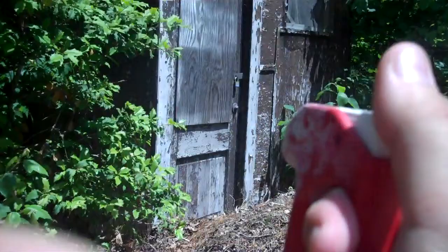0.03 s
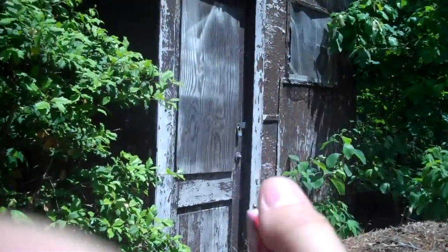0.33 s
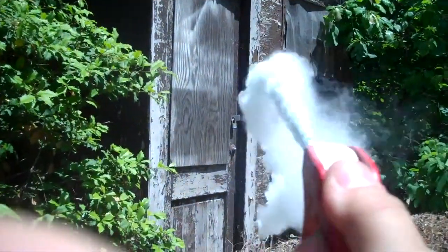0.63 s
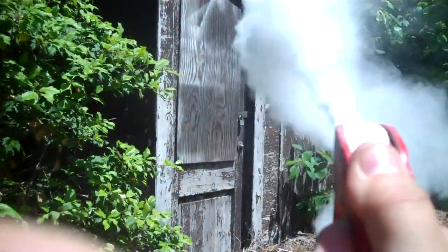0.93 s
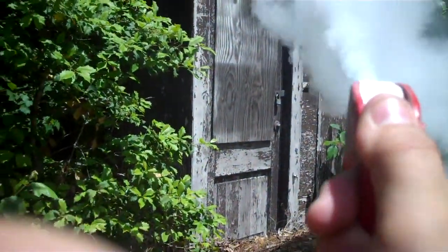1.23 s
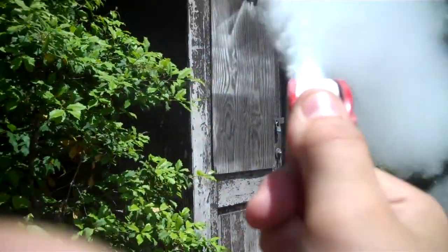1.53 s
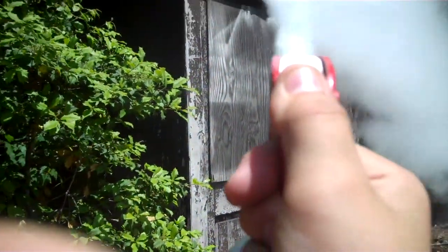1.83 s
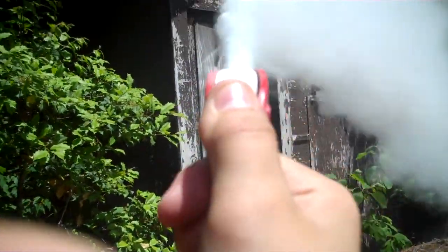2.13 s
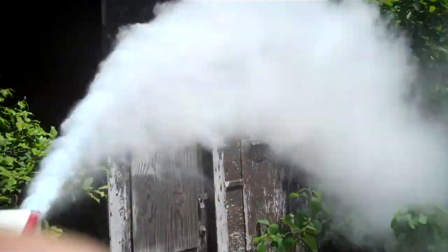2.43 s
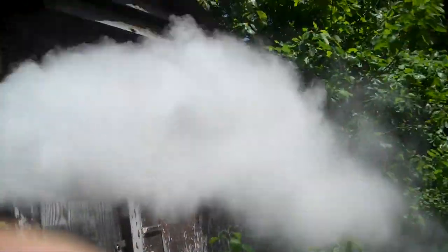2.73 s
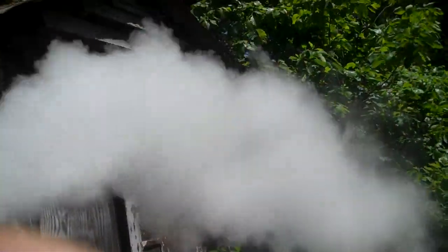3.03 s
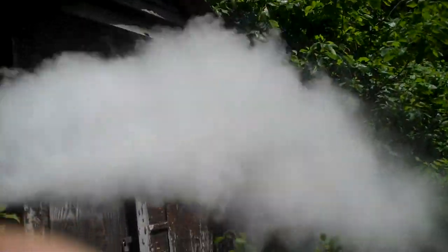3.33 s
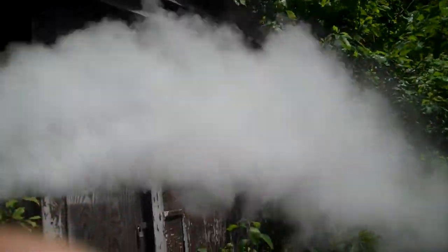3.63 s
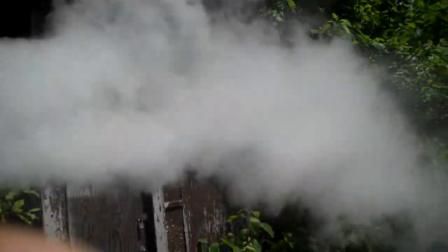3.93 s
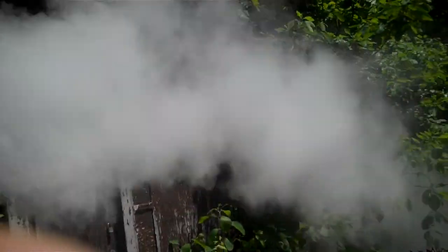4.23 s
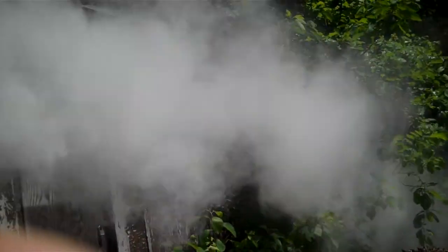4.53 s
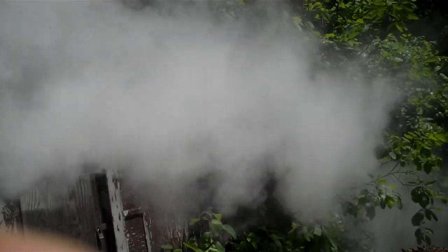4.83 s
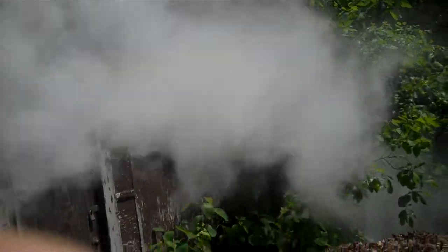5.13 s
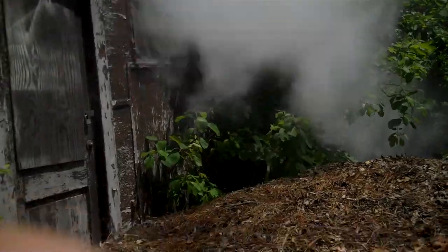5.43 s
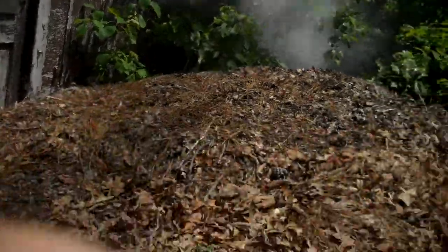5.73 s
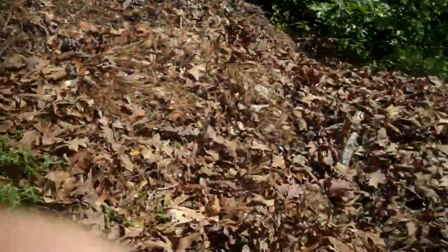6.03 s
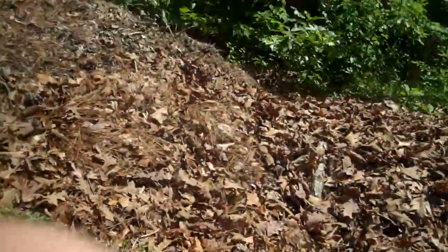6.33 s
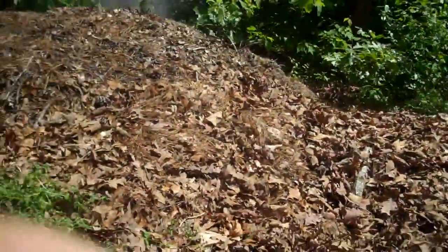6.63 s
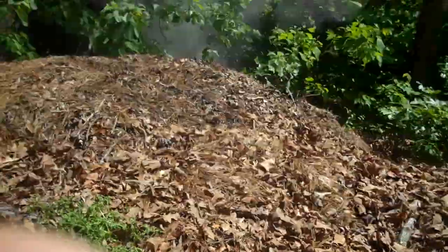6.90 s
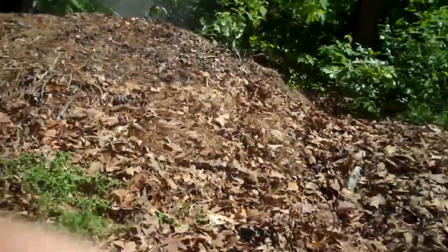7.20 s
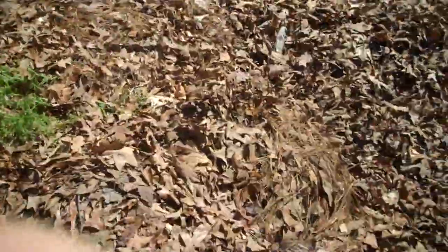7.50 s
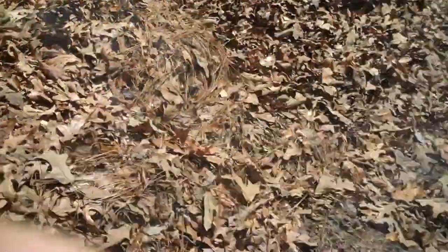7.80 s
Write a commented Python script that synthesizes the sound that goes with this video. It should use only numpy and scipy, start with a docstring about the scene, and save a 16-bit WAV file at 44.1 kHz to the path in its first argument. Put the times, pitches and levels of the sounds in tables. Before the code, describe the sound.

In a quiet wooded yard, dry leaves rustle and the plastic handle of a small fire extinguisher clicks lightly during the first second. At 1 second the valve pops with a dull whump, and a loud, close jet of gas and powder bursts out. It starts as a bright hissing roar and sputters and spits unevenly until about 3 seconds. Between 2.2 and 2.8 seconds its tone shifts as the nozzle swings aside. The jet weakens steadily and is gone just after 5 seconds. A few soft, short bird whistles come between 4.3 and 5.3 seconds. From 6 seconds to the end at about 8, feet shuffle and crunch through dry leaves with sharp little twig snaps, much quieter than the jet. One more bird whistles near the end. A soft outdoor hush and a very faint, distant mower drone lie underneath throughout.

```python
"""In a wooded yard, with a mower droning far away, leaves rustle and a small fire extinguisher is handled.
After one second its valve pops and a jet of gas and powder roars out, sputtering as the powder feeds
unevenly. The jet swings aside, then dies away by five seconds as the pressure falls, and birds whistle.
From six seconds on, feet shuffle through dry leaves and snap twigs. All of it is heard through two
closely spaced microphone openings (ports) beside the nozzle."""
import sys
import numpy as np
from scipy import signal
from scipy.fft import rfft, irfft
from scipy.io import wavfile

SR = 44100
rng = np.random.default_rng(int(sys.argv[2]) if len(sys.argv) > 2 else 0)


def generate_wav(signal):
    """Clip the signal to [-1, 1] and save it as 16-bit WAV at the path in sys.argv[1]."""
    frames = np.transpose(np.atleast_2d(signal))
    scaled = np.clip(frames, -1, 1) * 32767
    pcm = np.round(scaled).astype(np.int16)
    wavfile.write(sys.argv[1], SR, pcm)


N = 355446
TIME = np.arange(N) / SR
FREQ = np.maximum(np.arange(N // 2 + 1) * SR / N, 1)
VALVE_S, CUTOFF_HZ = 1.0105, 14300  # when the valve opens; where the treble ends

# The tone and direction of the jet when it points ahead. Each row: frequency in Hz, relative level in dB,
# how much louder the left port is in dB, how far the left wave runs ahead in radians.
JET_FRONT_TONE = [(116, -25.5, 0.5, 0), (350, -17, 3, 0), (640, -10, 2.5, -2.5), (930, -9.5, 2.5, 0.5),
                  (1700, -2, 2, 0.14), (2520, 1, 5, 0.5), (3200, -2, 10.5, -1.5), (3750, 0.5, 0.5, -2.08),
                  (5050, -4, -8.5, 0), (5240, 1.5, -4, -1.5), (6450, -2.5, -0.5, 1), (7100, -2, 13, 0.5),
                  (8840, -11.5, 10.5, -2.1), (10630, -18.5, 13, -1.5), (11400, -60, 19, -2.5)]
# The tone and direction of the leaves underfoot, with the same columns.
LEAF_TONE = [(100, -59, 2, 0), (366, -10, 3, 1), (660, -11, 3, -.1), (1110, -14, 3.4, 6),
             (1800, -14, 0.87, 0.9), (3000, -10, 2.9, 0.7), (4600, -6, 6.6, 1), (5600, -3.5, 1, 1),
             (6800, 2.5, 17.4, -1.5), (7560, -5, 17, -1.3), (9560, -21, 7.6, -2.5), (14000, -28, 19, -2)]


def jet(sputter_db=1.53, flutter_db=1.26, powder_share=0.59,
        roar_gain_db=-0.97, hiss_gain_db=-2.0, sizzle_db=-14):
    """Swirling gas carries powder grains; the uneven feed makes it sputter, less as the pressure falls."""
    # The nozzle's swing. Each row: time in seconds, position from 0 (ahead) to 1 (aside).
    swing = [(2.2, 0.022), (2.45, 0.36), (2.6, 0.61), (2.8, 1.0)]
    # The jet when it points aside, with the same columns as JET_FRONT_TONE.
    jet_aside_tone = [(100, -27, 4, 1), (252, -19, 4, .1), (784, -8.5, 4, 0.17), (1090, -9.5, 5, 0),
                      (2220, -2, 5, 0.5), (3400, -0.5, 4.5, 0.55), (4450, -4.5, 1.5, 1.0),
                      (5520, -0.5, -2, 1.72), (6090, 1, 2.5, 3.5), (7000, 0, 22, 1), (8100, -4.5, 13, 2.4),
                      (9400, -19.5, 10, 1.2), (10500, -40.5, 6, 2.5)]
    roar_db, hiss_db = jet_levels()
    aside = np.clip(in_time(swing)[0], 0, 1)
    pressure = from_db(0.1 * (roar_db - roar_db.max()))
    wobble_db = pressure * (sputter_db * drift(43) + flutter_db * drift(330))
    out = 0
    for tone, share in (JET_FRONT_TONE, 1 - aside), (jet_aside_tone, aside):
        powder = band(grains(3000, spread_db=5.5), 680, 4700)
        flow = rng.standard_normal(N) + powder_share * pressure * powder
        roar, hiss = low_and_high(flow, tone, split_hz=4770)
        roar = roar * from_db(roar_db + roar_gain_db + wobble_db)
        hiss = past_the_hand(hiss, aside) * from_db(hiss_db + hiss_gain_db + 0.88 * wobble_db)
        out = out + np.sqrt(share) * (roar + hiss)
    # the fastest flow adds a sizzle at the very top, which grows faster than the hiss
    sizzle = band(band(rng.standard_normal(N), 9300, 14000), 9300, 14000)
    sizzle_gain = from_db(hiss_db + sizzle_db + 0.67 * (hiss_db - hiss_db.max()))
    out = out + placed(sizzle / rms(sizzle) * sizzle_gain, JET_FRONT_TONE)
    return out * gate(VALVE_S, 5.1, rise=0.00094, fall=0.17)


def jet_levels(hiss_below_db=8.5, opening_end_s=1.41, opening_fade_s=0.34, hiss_build_s=0.088):
    """Roar and hiss in dB: both follow the flow; gulps of powder move the roar, flares of gas the hiss."""
    # The flow weakens as the canister empties. Each row: time in seconds, level in dB.
    flow = [(1.01, -22), (1.8, -22.5), (2.58, -25.5), (3.15, -32.5), (4.05, -37.5), (4.96, -50.5),
            (5.3, -69)]
    # The powder surges (+) or chokes (-). Each row: middle in seconds, length in seconds, change in dB.
    gulps = [(1.08, 0.25, 4), (1.315, 0.11, -5), (1.71, .04, 3), (1.74, 0.047, -5), (1.77, .04, 4),
             (1.945, 0.024, -2.5), (2.06, 0.083, -6), (2.097, 0.029, 4), (2.15, .04, -3), (2.2, .05, -1.5),
             (2.43, 0.15, -3.5), (2.52, 0.14, 2), (2.72, 0.26, -2.5), (2.812, 0.035, 6), (2.91, 0.082, -6),
             (2.98, 0.16, 2.5), (3.41, .1, 2.5)]
    # Flares of nearly pure gas, with the same columns as the gulps.
    flares = [(1.11, .09, 6.5), (1.25, 0.11, 7), (2.02, 0.15, 6), (2.35, 0.14, 9), (2.69, .2, 3.5),
              (3.62, 0.54, 3.5), (4.25, 0.44, 4.5)]
    flow_db, = in_time(flow)
    # at first the gas carries little powder and sounds bright
    opening_db = 9 * np.clip(1 - (TIME - opening_end_s) / opening_fade_s, 0, 1)
    # the hiss builds up behind the first slug of powder
    lag_db = 7 * np.clip(1 - ((TIME - VALVE_S) / hiss_build_s) ** 2, 0, 1)
    return flow_db + swells(gulps), flow_db - hiss_below_db + opening_db - lag_db + swells(flares)


def past_the_hand(x, aside, depth=0.86, first_hz=6000, last_hz=10000):
    """While the nozzle swings, sound bouncing off the hand cancels a rising band of the hiss."""
    delay = .5 / (first_hz + (last_hz - first_hz) * aside)
    strength = depth * np.sqrt(4 * aside * (1 - aside))
    bounce = np.array([np.interp(TIME - delay, TIME, side) for side in x])
    return (x + strength * bounce) / (1 - .5 * np.minimum(strength, 1))


def first_gust(gust_db=-27, decay_s=0.23, thump_db=-37):
    """The first slug of powder leaves with a dull whump and jolts the hand."""
    age = np.maximum(TIME - VALVE_S, 0)
    gust = band(band(rng.standard_normal(N), 380, 1550), 355, 1500)
    gust = gust / rms(gust) * from_db(gust_db) * np.exp(-age / decay_s)
    thump = band(rng.standard_normal(N), 20, 320)
    thump = thump / rms(thump) * from_db(thump_db) * np.exp(-age / 0.017)
    return placed((gust + thump) * (age > 0), JET_FRONT_TONE)


def canister(spit_db=-6.0, knock_db=-0.5, body_db=-17):
    """The valve pops, powder spits and the handle knocks; each knock also thuds in the hollow body."""
    # Clumps of powder leave the nozzle. Each row: time in seconds, relative peak in dB.
    spits = [(1.02, -8), (1.049, 4), (1.063, 4.5), (1.075, -18), (1.169, -3), (1.509, -2), (1.574, -1.5),
             (1.76, -2), (1.846, 0), (2.096, -12), (2.123, -9), (2.168, -4), (2.228, -6), (2.254, 0),
             (2.802, -8)]
    # The plastic handle knocks and creaks. Each row: time in seconds, relative peak in dB, pitch in Hz.
    knocks = [(0.159, -17.5, 3485), (.247, -18.5, 3460), (.281, -23, 3180), (.329, -17, 3800),
              (.579, -18.5, 3170), (0.587, -13, 2860), (.5895, -20, 1770), (.5945, -25, 2600),
              (.598, -31, 2400), (0.6008, -25, 2800), (.970, -24, 3870), (.9845, -19.5, 3250),
              (0.99, -19, 5500), (1.001, -25, 3470), (1.004, -21, 3500), (4.312, -28.5, 1210),
              (5.287, -36, 2500), (5.627, -35, 1980), (6.057, -30, 1507), (7.352, -26.5, 1130)]
    out = np.zeros(N)
    pop = 1.5 * crack(1800, 4400, decay_s=.0008, tail_share=.02)
    add(out, VALVE_S, pop)
    for s, db in spits:
        spit = crack(1480, 3850, decay_s=.001, tail_share=0.093)
        add(out, s + 0.000996, from_db(db + spit_db) * spit)
    for s, db, hz in knocks:
        click = crack(0.7 * hz, 1.43 * hz, decay_s=2.0 / hz, tail_share=0.21)
        thud = crack(315, 1370, decay_s=0.00076, tail_share=0.068)
        add(out, s + 0.000905, from_db(db + knock_db) * (click + from_db(body_db) * thud))
    return placed(out, JET_FRONT_TONE)


def leaves(crunch_gain_db=-2.5, slide_share=0.6, clump_db=0.74, leaf_db=3.0):
    """Leaves of each size crack in clumps and slide over one another; a heavier step breaks more."""
    crackle_db, crunch_db = tread_levels()
    cracks_per_s = 3000 * from_db(.4 * (crackle_db - crackle_db.max()))
    edges_hz = np.geomspace(900, 15000, num=7)
    sliding = slide_share * rng.standard_normal(N)
    cracks = sum(band(grains(cracks_per_s, spread_db=3.0), low, high) * from_db(leaf_db * drift(28))
                 for low, high in zip(edges_hz, edges_hz[1:]))
    rustle = (cracks + sliding) * from_db(clump_db * drift(110))
    crunch, crackle = low_and_high(rustle, LEAF_TONE, split_hz=3280)
    return crackle * from_db(crackle_db) + crunch * from_db(crunch_db + crunch_gain_db)


def tread_levels(rise_s=0.024, settle_s=0.044):
    """High crackle and low crunch in dB: each step rises, holds and settles over the stirring leaves."""
    # A foot presses or brushes the leaves.
    # Each row: start in seconds, length in seconds, crackle in dB, relative crunch in dB.
    treads = [(0.143, 0.029, -35, -40.5), (.19, 0.077, -37, -48), (6.075, 0.1, -33, -47.5),
              (6.252, 0.068, -29, -42.5), (6.419, 0.077, -36, -43), (6.508, 0.032, -42.5, -54),
              (6.812, .11, -36.5, -49), (6.978, 0.037, -39, -42), (7.165, .03, -43, -44),
              (7.298, 0.013, -32, -37.5), (7.358, 0.023, -38, -43.5), (7.521, 0.026, -35, -51),
              (7.686, 0.13, -36, -46.5), (7.845, 0.046, -29, -40)]
    # The leaves keep stirring while the feet move.
    # Each row: start in seconds, end in seconds, crackle in dB, relative crunch in dB.
    stirs = [(.11, .54, -50, -63), (6.057, 8.1, -47, -50)]
    power = np.full((2, N), 1e-12)
    for s, length, *levels_db in treads:
        before = np.maximum(s - TIME, 0) / rise_s
        after = np.maximum(TIME - s - length, 0) / settle_s
        shape = np.exp(-np.minimum(before ** 2 + after, 20))
        power += np.outer(from_db(levels_db), shape) ** 2
    for start, end, *levels_db in stirs:
        power += np.outer(from_db(levels_db), gate(start, end, rise=.02, fall=0.086)) ** 2
    return 10 * np.log10(power)


def twigs(snap_db=-1.0, edge_db=-12, edge_hz=9500, thin_hz=7000, edge_db_per_octave=22):
    """Dry stalks break underfoot, each at its own pitch; the thinner ones have a crisp edge on top."""
    # Twigs and leaf stalks snap. Each row: time in seconds, relative peak in dB, pitch in Hz.
    snaps = [(.184, -20, 7100), (0.268, -21, 6400), (.390, -21, 5900), (0.4391, -16, 8300),
             (.472, -26.5, 6040), (0.534, -18.5, 7060), (6.024, -18, 7100), (6.064, -26, 6800),
             (6.484, -15, 5560), (6.7708, -22, 6550), (6.9305, -19, 5820), (6.99, -11.5, 5780),
             (6.9962, -17, 5500), (7.071, -11, 4660), (7.1013, -13.5, 6030), (7.2316, -8.5, 6900),
             (7.360, -16, 5500), (7.37, -13.5, 5670), (7.413, -21, 4570), (7.804, -20.5, 4000)]
    out = np.zeros(N)
    for s, db, hz in snaps:
        body = crack(0.55 * hz, 1.27 * hz, decay_s=0.00092, tail_share=0.065, broad_share=0.8)
        edge = crack(edge_hz, CUTOFF_HZ, decay_s=0.00012, tail_share=0.017)
        edge_gain = from_db(edge_db + edge_db_per_octave * np.log2(hz / thin_hz))
        add(out, s + 0.0011, from_db(db + snap_db) * (body + edge_gain * edge))
    return placed(out, LEAF_TONE)


def yard(x, scatter_db=-17, scatter_s=0.004):
    """Adds a few dull echoes, and brief scatter off leaves and hand that differs at each port."""
    # Echoes from the shed and the ground. Each row: delay in seconds, level in dB.
    echoes = [(.0085, -24.5), (.019, -33), (.031, -30)]
    t = np.arange(2048) / SR
    scatter = band(rng.standard_normal((2, len(t))) * np.exp(-t / scatter_s), 2250, 13400)
    scatter /= np.sqrt(2 * np.sum(scatter ** 2, axis=1, keepdims=True))
    out = x + from_db(scatter_db) * signal.fftconvolve(x, scatter, axes=1)[:, :N]
    dull = band(x, 200, 3900)
    for delay, db in echoes:
        lag = int(delay * SR)
        out[:, lag:] += from_db(db) * dull[::-1, :-lag]  # left and right swap
    return out


def mower(lull_db=-70.5, tones_db=-61, nearest_s=4.9, fade_db_per_s=1.4, waver_db=2.0):
    """Only the low exhaust tones of a one-cylinder engine carry this far, wavering on the way."""
    # The engine's speed. Each row: time in seconds, firings per second.
    speed = [(.4, 22.3), (.9, 23.6), (2.3, 26.2), (3.0, 23.6), (3.5, 24), (4.2, 23), (4.7, 24.5),
             (5.05, 25.4), (5.6, 25), (7.3, 24), (7.9, 25.6)]
    # The exhaust boom swells. Each row: middle in seconds, length in seconds, dB above the lull.
    booms = [(1.5, 1.3, 11.5), (2.95, 1.8, 8.5), (4.3, 1.32, 13), (5.95, 1.9, 11), (7.65, 2.9, 11)]
    # The tones above the boom. Each row: multiple of the firing rate, relative level in dB.
    overtones = [(6, -9), (7, -10.5), (8, -1.5), (10, -6.5), (13, -10)]
    firing_hz, = in_time(speed)
    phase = 2 * np.pi * np.cumsum(firing_hz) / SR
    boom = from_db(lull_db + swells(booms)) * np.sin(5 * phase)
    tones = sum(from_db(db + waver_db * drift(0.67)) * np.sin(multiple * phase + rng.uniform(0, 2 * np.pi))
                for multiple, db in overtones)
    tones_gain = from_db(tones_db - fade_db_per_s * np.abs(TIME - nearest_s))
    return np.sqrt(2) * (boom + tones_gain * tones)


def birds():
    """Birds give soft whistles that glide a little in pitch."""
    # Each row: start in seconds, length in seconds, first pitch in Hz, last pitch in Hz, level in dB.
    whistles = [(4.306, .14, 2190, 2200, -54), (4.641, 0.11, 2220, 2275, -50),
                (4.77, 0.057, 2900, 3000, -47), (4.988, 0.13, 2194, 2270, -51.5),
                (5.134, 0.059, 2950, 2970, -48), (5.207, 0.1, 2980, 2950, -55),
                (7.92, 0.098, 2300, 2460, -47)]
    out = np.zeros(N)
    for s, length, start_hz, end_hz, db in whistles:
        hz = np.linspace(start_hz, end_hz, int(length * SR))
        whistle = np.sin(2 * np.pi * np.cumsum(hz) / SR)
        add(out, s, from_db(db) * np.sqrt(np.hanning(len(hz))) * whistle)
    return out


def air(air_db=-49.0, alike_hz=4000, whine_hz=1497, whine_db=-63, swish_db=-57):
    """Outdoor hush, with a faint far whine and the swish of the mower's blade."""
    # The tone and direction of the hush, with the same columns as JET_FRONT_TONE.
    hush_tone = [(30, -15, 0, 0), (70, -6.5, -13, 0), (160, -2.5, -15, 0), (480, -3.5, 4.5, -0.84),
                 (784, 1.5, 4.5, -0.88), (1320, -2.5, 4.5, -1.3), (2200, -2.5, 1.5, -1.8),
                 (3200, -4, 6, -1.7), (4300, -6.5, 1.5, -2.2), (5730, -6.5, -4, -1.9),
                 (6940, -4, 12, -0.63), (8000, -13.5, 11, -1.6), (9900, -21.5, 2, -1.6),
                 (14000, -23, 2, -1.6)]
    level_db, balance_db, lead = in_frequency(hush_tone)
    alike = 1 / (1 + (FREQ / alike_hz) ** 3)  # in the bass both ports hear the same noise
    shared, own = rfft(rng.standard_normal(N)), rfft(rng.standard_normal((2, N)))
    spectrum = np.sqrt(alike) * shared + np.sqrt(1 - alike) * own
    hush = irfft(spectrum * from_db(level_db) * ports(balance_db, lead), N)
    whine = drift(21) * np.sin(2 * np.pi * whine_hz * TIME) * gate(3.5, 5.8, rise=0.73, fall=.6)
    swish = band(rng.standard_normal(N), 890, 1160)
    swish = swish / rms(swish) * gate(5.46, 6.86, rise=0.63, fall=1.0)
    return from_db(air_db) * hush / rms(hush) + from_db(whine_db) * whine + from_db(swish_db) * swish


def rumble(rumble_db=-63, low_hz=35, high_hz=260):
    """A faint, wide low rumble, opposite in the two channels."""
    low = band(rng.standard_normal(N), low_hz, high_hz)
    return from_db(rumble_db) * low / rms(low) * np.array([[1], [-1]])


def crack(low_hz, high_hz, decay_s, tail_share, first_blow=2.13, broad_share=1.0):
    """A sharp blow and a brief rough rattle, ringing mainly between two frequencies; its peak is 1."""
    t = np.arange(1024) / SR
    contact = rng.choice([-1, 1], len(t)) * (np.exp(-t / decay_s) + tail_share * np.exp(-t / 0.0099))
    contact[:2] = first_blow
    broad = band(contact, low_hz, high_hz)
    sound = band(broad, low_hz, high_hz) + broad_share * broad
    return sound / np.abs(sound).max()


def grains(per_s, spread_db):
    """Tiny random impacts of very unequal size, at an average level of 1."""
    sizes = from_db(spread_db * np.minimum(rng.exponential(1, N), 4.5)) * rng.choice([-1, 1], N)
    clicks = sizes * (rng.random(N) < per_s / SR) / np.sqrt(per_s)
    return clicks / rms(clicks)


def low_and_high(x, tone, split_hz):
    """Gives a sound a tone and direction, then splits it into bass and treble, each at level 1."""
    level_db, balance_db, lead = in_frequency(tone)
    bass_cut = FREQ ** 2 / (FREQ ** 2 + 60 ** 2)
    spectrum = rfft(x) * from_db(level_db) * ports(balance_db, lead) * bass_cut
    low_share = 1 / (1 + (FREQ / split_hz) ** 8)
    parts = irfft(spectrum * low_share, N), irfft(spectrum * (1 - low_share), N)
    return [part / rms(part.mean(axis=0)) for part in parts]


def placed(x, tone):
    """Turns one channel into two, using only the direction from a tone table."""
    _, balance_db, lead = in_frequency(tone)
    return irfft(rfft(x) * ports(balance_db, lead), N)


def ports(balance_db, lead):
    """How the left and right ports share each frequency, keeping the total power the same."""
    # the ports sit so close together that low sounds reach both nearly in step
    widest = 2 * np.pi * FREQ * 8.5e-5 * np.minimum(FREQ / 2500, 1)
    turn = np.exp(.5j * np.clip(lead, -widest, widest))
    ratio = from_db(balance_db)
    return np.array([ratio * turn, 1 / turn]) * np.sqrt(2 / (1 + ratio ** 2))


def drift(rate_hz):
    """A smooth random wander, about 1 in size, mostly slower than the given rate."""
    spectrum = rfft(rng.standard_normal(N // 16 + 2))
    slow = irfft(spectrum / (1 + (FREQ[:len(spectrum)] / rate_hz) ** 2))
    return np.interp(np.arange(N) / 16, np.arange(len(slow)), slow / rms(slow))


def swells(rows):
    """Smooth bumps in dB, each with its middle, length and height."""
    return sum(db * np.cos(np.pi * np.clip((TIME - s) / length, -.5, .5)) ** 2 for s, length, db in rows)


def gate(start, end, rise, fall):
    """Fades in from the start, holds at 1 and fades out after the end; all in seconds."""
    return np.clip((TIME - start) / rise, 0, 1) * np.clip((end - TIME) / fall + 1, 0, 1)


def in_time(rows):
    """Fills in a table's columns for every sample."""
    s, *columns = np.transpose(rows)
    return [np.interp(TIME, s, c) for c in columns]


def in_frequency(rows):
    """Fills in a table's columns for every frequency."""
    hz, *columns = np.transpose(rows)
    return [np.interp(np.log(FREQ), np.log(hz), c) for c in columns]


def band(x, low_hz, high_hz):
    """Keeps mainly what lies between two frequencies."""
    sections = signal.butter(2, [low_hz, min(high_hz, .45 * SR)], "band", fs=SR, output="sos")
    return signal.sosfilt(sections, x + 1e-18)


def add(track, s, sound):
    """Mixes a short sound in at a time in seconds."""
    at = int(s * SR)
    track[at:at + len(sound)] += sound[:N - at]


def from_db(db):
    """Turns decibels into a number to multiply by."""
    return 10 ** (np.asarray(db) / 20)


def rms(x):
    """The average level of a sound (root mean square)."""
    return np.sqrt(np.mean(x ** 2) + 1e-20)


def scene():
    """The near sounds echo in the yard over the far background."""
    near = jet() + first_gust() + canister() + leaves() + twigs()
    slightly_left = from_db([[1.1], [-1.2]])
    far = air() + rumble() + (mower() + birds()) * slightly_left
    return yard(near) + far


def record(dry):
    """The sound starts after a moment, is clipped at full scale and loses its highest treble."""
    clipped = np.clip(dry * gate(.084, 9, rise=.004, fall=1), -1, 1)
    return irfft(rfft(clipped) / np.sqrt(1 + (FREQ / CUTOFF_HZ) ** 200), N)


dry = scene()
out = record(dry)
generate_wav(out)
```